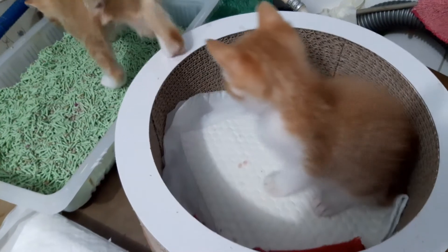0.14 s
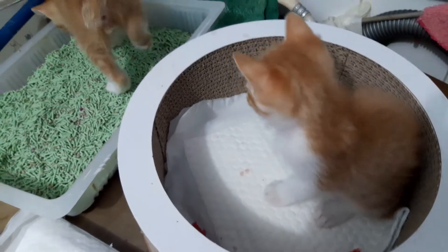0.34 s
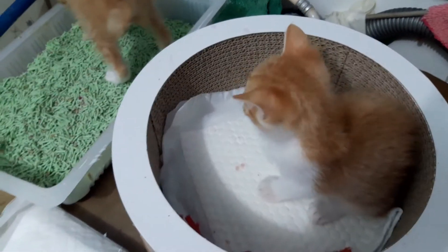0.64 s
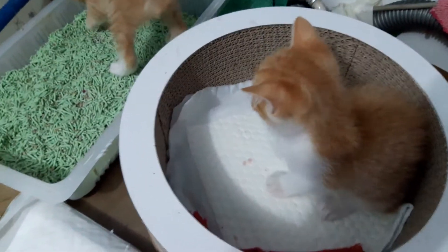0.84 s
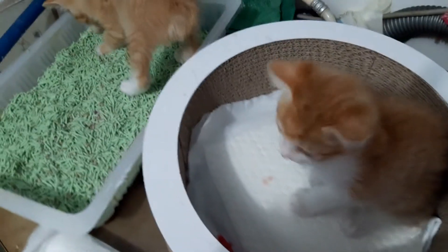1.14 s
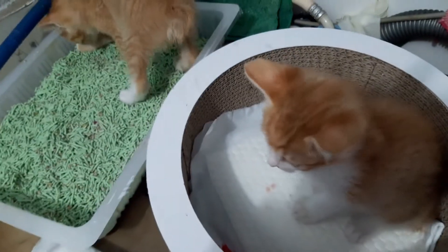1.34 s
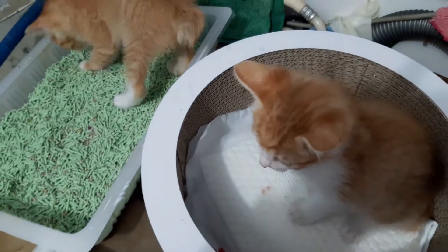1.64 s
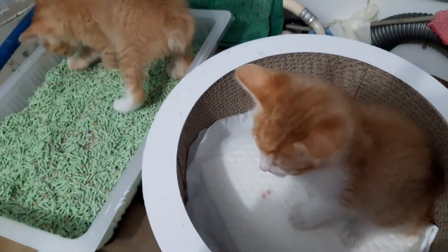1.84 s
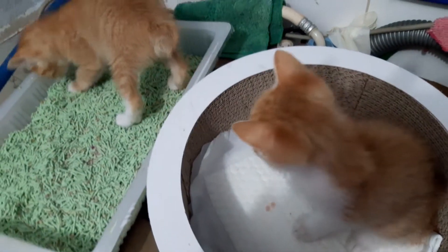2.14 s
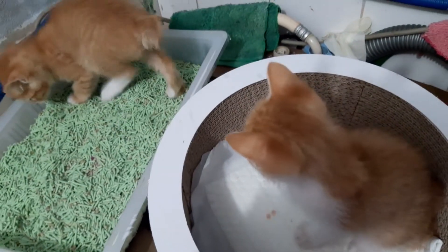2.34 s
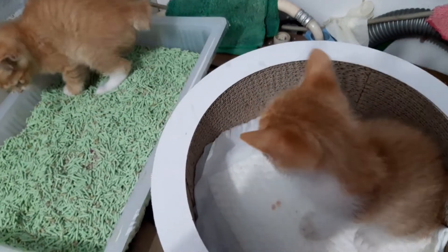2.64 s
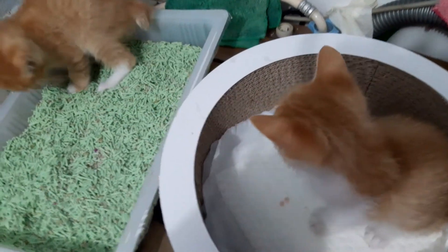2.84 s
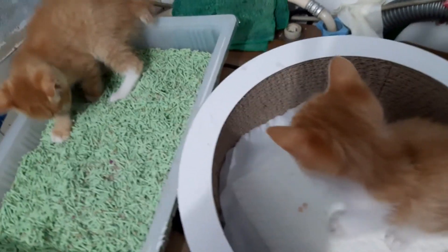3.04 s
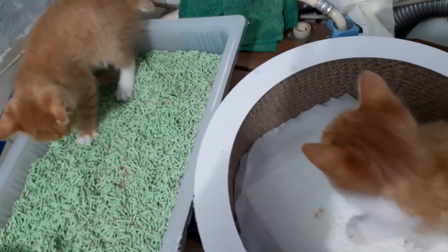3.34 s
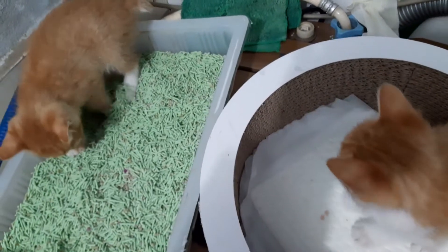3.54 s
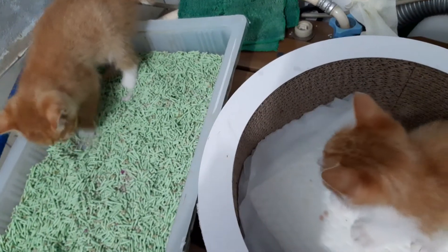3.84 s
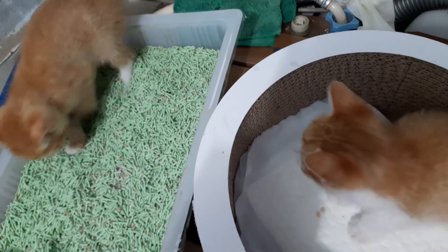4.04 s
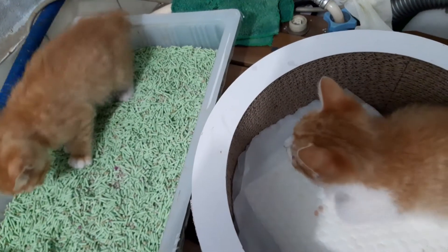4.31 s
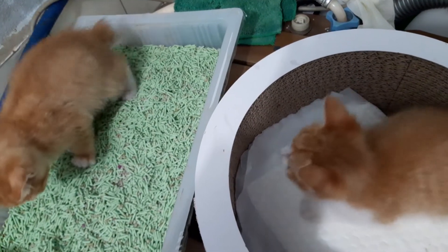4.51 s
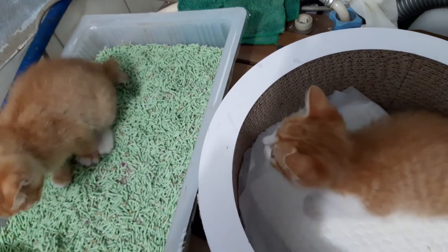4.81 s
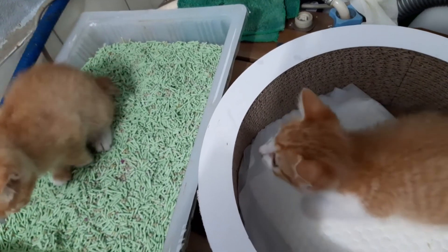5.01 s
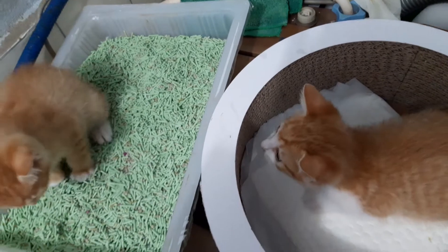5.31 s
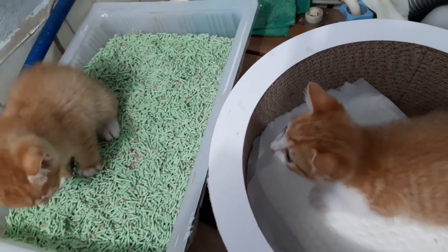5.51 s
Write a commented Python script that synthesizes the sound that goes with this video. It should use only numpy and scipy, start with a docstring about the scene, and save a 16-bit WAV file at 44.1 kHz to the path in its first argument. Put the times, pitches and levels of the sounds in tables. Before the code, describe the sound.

A kitten scrapes and digs in pellet litter in a plastic tray, with uneven crunching strokes, rattling grains and small plastic clicks in a quiet room.

```python
"""Kitten digging in pellet litter

A kitten steps and digs in pellet litter in a plastic tray, close to a pair of spaced microphones in a small room.
Paw strokes are swelling showers of random contacts: pellets rattle, tray modes drum, walls knock, the floor booms.
Single ticks are short decaying sine bursts, soft steps are blunt pushes into the tray modes, swishes are puffs of
filtered noise. Short noise echoes and a faint room noise surround it all."""
import sys
import numpy as np
from scipy import signal
from scipy.io import wavfile

SR = 44100
rng = np.random.default_rng(int(sys.argv[2]) if len(sys.argv) > 2 else 0)


def master_out(mix):
    """Clip the mix to full scale and print it as 16-bit PCM to the path in sys.argv[1]."""
    frames = np.transpose(np.atleast_2d(mix))
    ceiling = np.clip(frames, -1, 1)
    pcm = np.round(ceiling * 32767).astype(np.int16)
    wavfile.write(sys.argv[1], SR, pcm)


N = 249870   # length in samples

# Paw strokes and shifts of weight. Each row: start of full pressure in seconds, hold in seconds,
# swell in seconds per 20 dB, fade in seconds per 20 dB (scaled for each layer below), drumming level in dB,
# then hollow modes, rattle, dust, wall knock and floor boom in dB above the drumming, left over right in dB.
STROKES = [(0.044, 0.021, 0.035, 0.11, -61, -1.1, -10, -16, -7.5, -13.3, -1.5),
           (0.337, 0.025, 0.075, 0.093, -96, 19, -22, 4.8, 12, 12, -2.9),
           (0.473, 0.017, 0.22, 0.99, -71.5, -24.4, -6, -5.5, -22, -11, -2),
           (0.562, 0.02, 0.018, 0.061, -71, -9, -2, -2, -20, -25, 2),
           (0.599, 0.049, 0.031, 0.034, -57.3, -14, -10, -17, -18, -36, 1.5),
           (0.65, 0.079, 0.041, 0.065, -63.5, 3.5, -7, -9.5, -3, -4, -0.5),
           (0.851, 0.011, 0.051, 0.04, -54, -10, -3, -2, -9, -18, -3),
           (0.856, 0.042, 0.0085, 0.16, -64.5, 11, -6, -5, 12.5, 9.5, 5),
           (1.198, 0.07, 0.071, 0.12, -44.5, -2.7, -9.5, -14.5, -11, -18.5, 4),
           (1.419, 0.011, 0.08, 0.074, -67, -23, -13, -10, -32.7, -31.1, 4.0),
           (1.578, 0.046, 0.051, 0.095, -38.5, -4.5, -9.0, -14.5, -12, -26, 2.5),
           (1.789, 0.072, 0.06, 0.12, -40.5, -4.5, -9, -14.5, -15.5, -26.0, 1.5),
           (1.981, 0.017, 0.033, 0.092, -44.5, -4.5, -9, -12, -7, -23.5, 4),
           (2.191, 0.0044, 0.3, 0.12, -64.5, 2.5, -12, -16, -4, -8, 1),
           (2.338, 0.0092, 0.01, 0.1, -81.5, -2, 7, 8, -5, -5, 0),
           (2.352, 0.13, 0.402, 0.28, -73, 2.3, -11, -21, -5, -7.5, -0.6),
           (2.533, 0.018, 0.034, 0.047, -56.5, 1.3, -10.9, -15.9, -10, -20, 1.9),
           (2.685, 0.071, 0.015, 0.22, -65.5, 3.5, -8.5, -16, -13, -12, 1),
           (2.797, 0.027, 0.099, 0.14, -56, 0.6, -8, -14.5, -14.5, -26, 3),
           (2.99, 0.025, 0.032, 0.049, -49, 0.5, -5.5, -14, -14.5, -29, 5.5),
           (3.115, 0.0046, 0.14, 0.1, -63.5, -2, -14, -13.8, -18, -38, 1),
           (3.229, 0.067, 0.065, 0.073, -48, 2, -7, -11, -6, -26, 3.0),
           (3.385, 0.055, 0.039, 0.083, -43, 0.3, -5, -12, -5, -20.5, 1),
           (3.45, 0.024, 0.072, 0.077, -39, -1, -10, -18, -13.5, -32, 3),
           (3.505, 0.046, 0.089, 0.1, -53.2, -2.9, -9.0, -11, -33.5, -43, 5),
           (3.668, 0.066, 0.067, 0.064, -39.5, -0.8, -5, -11.5, -11.5, -18, 2.5),
           (3.808, 0.013, 0.058, 0.14, -34.5, -1, -3, -8.5, -11, -27, 1.5),
           (3.871, 0.072, 0.12, 0.12, -36.5, -6, -8, -14, -17.5, -25, 2.5),
           (4.195, 0.062, 0.043, 0.04, -64.5, 2.2, -6.5, -22, 2.7, -16, -3),
           (4.322, 0.01, 0.32, 0.038, -57.5, -6, -12, -16.5, -11.8, -16.7, 2.5),
           (4.362, 0.015, 0.027, 0.16, -61, -2.7, -5.5, -17, -17.7, -24, -0.5),
           (4.467, 0.0093, 0.012, 0.062, -61.5, 6.5, -14, -13, -16, -12, 8),
           (4.503, 0.062, 0.024, 0.071, -53.5, -1.5, -9.5, -16, -5, -15, 1.5),
           (4.68, 0.0057, 0.032, 0.055, -62, -7.5, -17.5, -22, -12, -29.6, 3),
           (4.749, 0.09, 0.088, 0.41, -73.5, 1.5, -25, -19, 1, -1.5, 2),
           (4.911, 0.032, 0.027, 0.04, -64.5, -2.5, -25, -26.5, -21, -37.3, -2),
           (4.992, 0.021, 0.0092, 0.099, -54, -11.5, -9.5, -18, -18, -27, -0.5),
           (5.141, 0.067, 0.27, 0.062, -69, 1.5, -19, -19, -5, -9, 0),
           (5.249, 0.079, 0.031, 0.033, -53.5, -0.5, -8, -17.5, 2.5, -7, 0),
           (5.376, 0.058, 0.19, 0.11, -67, -1.5, -12.5, -15.5, -4, -4, 2),
           (5.57, 0.058, 0.043, 0.021, -80, -0.5, -19, -21, -23, -11, -3)]
# Delay of each stroke layer. In order: drumming, hollow, rattle, dust, knock, boom, in seconds; heavy parts answer late.
LAYER_LAG_S = (0, 0, .001, 0.0042, 0.0089, 0.013)
# Fade of each stroke layer, same order, as a factor on the stroke's fade; the heavy parts die slowest.
LAYER_FADE = (0.91, 0.92, 0.76, 0.75, 1.34, 2.16)
# Resonances of the tray walls and floor. Each row: frequency in Hz, width in Hz, relative level in dB.
TRAY_MODES = [(480, 53.5, -5), (558.7, 52.6, -1), (680, 51, -2), (743.3, 33, 2), (824, 46, 2),
              (925, 81, -2), (1122, 154, -7.5), (1341, 71, -5), (1498, 235, -6), (1830, 78, 1),
              (2015, 87, 0), (2154, 290, -3), (2400, 290, -6), (2627, 132, -2), (2828, 460, -9.5),
              (3554, 465, -9), (3730, 1040, -14), (4450, 530, -18.5)]
# Whole-wall bending. Each row: frequency in Hz, width in Hz, relative level in dB.
KNOCK_MODES = [(146.7, 5.6, 2.5), (235.3, 23, 3), (293, 36, 1), (330, 72, 2), (432, 68, -5.5)]
# The tray floor. Each row: frequency in Hz, width in Hz, relative level in dB.
BOOM_MODES = [(69.3, 20.7, -0.5), (111, 62.5, 3), (130.5, 39, 3)]
# Colour of pellet on pellet. Each row: frequency in Hz, relative level in dB per Hz.
RATTLE_SPECTRUM = [(1650, -17), (2800, 0.5), (3260, -8.5), (4170, 5.5), (4930, -8.5), (6120, -6.5),
                   (6630, 10.5), (7550, -16), (8540, -3), (10400, -9), (11200, -5.5), (12500, -10),
                   (15800, -13.5)]
# Single pellets and claws on plastic. Each row: time in seconds, relative level in dB, tap frequency in Hz,
# coarse snap and fine snap in dB against the tap (before a fixed lift of each), left over right in dB.
TICKS = [(0.4001, -80.5, 1520, -1, 29, -2), (0.5526, -62, 2950, -15, -11, 1.5),
         (0.599, -48.5, 1590, -28, -17, -16), (0.6553, -53, 1640, -21, -22, 1.5),
         (0.71, -55, 1320, -17, -5, -10), (1.0594, -83, 1760, -12, 10, 1.5),
         (1.7647, -34, 2000, -23, -28, -1), (1.9997, -34, 1900, -16, -5.5, 0),
         (2.3372, -59, 1370, -16, 2, -3), (3.1076, -40, 1980, -26, -31, 3), (3.195, -58, 1770, -18, 10, -2),
         (3.221, -39, 1460, -16, -1, 5), (3.2525, -38, 2430, -18, -21, 0), (3.548, -48, 1880, -3, 3, 3),
         (3.81, -37, 1810, -1, -9, 2), (3.9574, -47, 1940, -7, -16, -2), (4.0361, -38, 1990, -22, -14, 0),
         (4.1893, -44, 2080, -29, -29, 4), (4.24, -48.5, 2110, -12.5, -9, 0),
         (4.2765, -54, 2630, -7, -3, 1.5), (4.3073, -51, 2200, -16, -24, -2),
         (4.3766, -50.5, 2200, -11, -24, 2), (4.438, -58, 1710, -17, -10, 1.5),
         (4.468, -38, 1820, -32, -27, -7), (4.4655, -42.5, 1780, -33, -34, 13),
         (4.5014, -41, 1830, -21, -24, 2), (4.5584, -44, 1900, -21, -23, 1.5),
         (4.6427, -52, 1740, -21, -25, 0), (4.6746, -45, 1850, -31, -34, -6),
         (4.897, -55, 1550, -30, -26, 1.5), (4.9347, -46.5, 1410, -35, -30, -2),
         (4.9887, -39, 2170, -20, -16.5, -6), (5.0017, -40.5, 2860, -22, -30, 15.5),
         (5.0091, -39, 1610, -32, -27, -5), (5.235, -42.5, 1910, -30, -26, 4),
         (5.2924, -42, 2350, -19, -18, 6)]
# Pellet snap, a coarse group and a fine group. Each row: frequency in Hz, width in Hz.
SNAP_GROUPS = [(4500, 1070), (6500, 1700)], [(9500, 3700), (13000, 5000)]
# Paws landing. Each row: time in seconds, relative level in dB.
STEPS = [(0.648, -55), (0.849, -57), (0.893, -44), (3.391, -46), (3.959, -37), (4.181, -54), (4.508, -59),
         (5.234, -46)]
# Brief hiss in the top treble, perhaps fur brushing a rim. Each row: centre in seconds, half-length in seconds,
# level in dB.
SWISHES = [(.07, 0.072, -73), (.46, .06, -81), (0.655, 0.063, -81), (0.87, .02, -57)]
# Colour of the room noise. Each row: frequency in Hz, relative level in dB per Hz.
HUSH_SPECTRUM = [(18, -35), (30, 13), (88, -11), (174, 5), (318, 0), (612, -5), (755, -1.5), (1210, -2),
                 (1890, -6), (4260, -16.5), (4980, -15), (12800, -9.5), (15800, -10)]

HOLLOW_TOP_HZ, DUST_HZ = 1234, 7550   # the tray's hollow modes lie below, the finest grit above
WIDE_PAN_SHARE = 0.024   # hollow modes and dust fill the tray and hardly follow the paw's side
LEFT_LAG_S = (-.00038, -.00004)   # lag of the left microphone for the two ends of the tray; negative is earlier
TICK_LAG_S = -.00046   # left lag of the ticks: loose pellets mostly strike the tray's left end
TAP_RISE_S = 0.00028
SWISH_HZ = (11500, 15500)
ROOM_T60_S, ROOM_DB, WALL_CUT_HZ = .16, -6, 4100   # echoes above the cut die faster still
HUSH_DB = -75.5
CUTOFF_HZ = 15780


def digging():
    """Harder strokes move more pellets; slow ones leave separate clicks; the bed gives way in small crunches."""
    drum_db, hollow_db, rattle_db, dust_db, knock_db, boom_db, pan_db = strokes()
    crunch = from_db(1.22 * drift(64))
    tray_hits_per_s = 600 + 2500 * from_db(.5 * (drum_db + 43.0))
    on_tray = crunch * contacts(tray_hits_per_s, uneven_db=3.0)
    pellet_hits_per_s = 150 + 4000 * from_db(.5 * (rattle_db + 54.5))
    on_pellets = crunch * contacts(pellet_hits_per_s, uneven_db=1.0)

    hollow, hard = split(resonate(on_tray, TRAY_MODES), HOLLOW_TOP_HZ)
    clicks = rms_one(on_pellets) + 0.59 * rms_one(on_tray)   # a hit on the tray clicks too
    coarse, dust = split(colour(clicks, RATTLE_SPECTRUM), DUST_HZ)
    aimed = from_db(drum_db) * hard + from_db(rattle_db) * coarse
    wide = from_db(hollow_db) * hollow + from_db(dust_db) * dust

    # the floor carries a little to each side alone
    push = rms_one(contacts(1500, uneven_db=2.5)) + 0.42 * rng.standard_normal((2, N))
    boom = rms_one(resonate(resonate(push, BOOM_MODES), BOOM_MODES))
    knock = split(resonate(push, KNOCK_MODES), 152)[1]
    weight = from_db(knock_db) * knock + from_db(boom_db) * boom
    return sides(pan_db) * aimed + sides(WIDE_PAN_SHARE * pan_db) * wide + weight


def strokes():
    """Strokes swell, hold and fade, adding in power; gives each layer's level and the drumming's side, all in dB."""
    s, hold_s, swell_s, fade_s, drum_db, *above_db, pan_db = np.transpose(STROKES)[:, :, None]
    coarse = np.arange(0, N + 64, 64)   # one point every 64 samples
    powers = []
    for extra_db, lag_s, fade in zip([0, *above_db], LAYER_LAG_S, LAYER_FADE):
        late = coarse / SR - s - lag_s
        before = np.maximum(-late / np.maximum(swell_s, .005), 0)
        after = np.maximum((late - hold_s) / np.maximum(fade * fade_s, .005), 0)
        level_db = drum_db + extra_db - 20 * (before + after)
        powers.append(from_db(level_db) ** 2 + 1e-20)
    # the stronger stroke pulls the side its way
    side_db = np.sum(pan_db * powers[0], axis=0) / np.sum(powers[0], axis=0)
    curves = [10 * np.log10(np.sum(p, axis=0)) for p in powers] + [side_db]
    return [np.interp(np.arange(N), coarse, c) for c in curves]


def contacts(per_s, uneven_db):
    """Random pellet contacts all over the tray, each with its own lag at the left microphone; steady power."""
    at = np.flatnonzero(rng.random(N) < per_s / SR)
    strength = from_db(uneven_db * np.minimum(rng.exponential(1, N), 5))
    sizes = strength * rng.choice([-1, 1], N) / np.sqrt(per_s)   # denser showers have weaker hits
    lag = np.round(rng.uniform(*LEFT_LAG_S, N) * SR).astype(int)
    out = np.zeros((2, N))
    np.add.at(out[0], np.clip(at + lag[at], 0, N - 1), sizes[at])
    out[1, at] = sizes[at]
    return out


def ticks():
    """A tick is a short tap of a few cycles, a snap above it and a faint ring of the tray."""
    out, taps = np.zeros((2, N)), np.zeros((2, N))
    lag = round(TICK_LAG_S * SR)
    # a wider resonance gives a shorter snap
    coarse, fine = (sum(burst(hz, 1 / (np.pi * width_hz)) for hz, width_hz in group) for group in SNAP_GROUPS)
    for s, level_db, tap_hz, coarse_db, fine_db, pan_db in TICKS:
        tap = burst(tap_hz, TAP_RISE_S)
        sound = tap + from_db(coarse_db + 7.5) * coarse + from_db(fine_db + 7.0) * fine
        for side, at in enumerate([round(s * SR) + lag, round(s * SR)]):
            gain = from_db(level_db + 3.0) * sides(pan_db)[side]
            out[side, at:at + len(tap)] += gain * sound
            taps[side, at:at + len(tap)] += gain * tap
    return out + from_db(-8.0) * resonate(taps, TRAY_MODES)


def steps():
    """A soft pad lands: one blunt push into the floor, wall and tray modes."""
    push = np.zeros(N)
    for s, level_db in STEPS:
        push[round(s * SR)] = from_db(level_db + 43.5)   # lifted, as the filters spread each impulse thin
    push = signal.lfilter(*signal.butter(2, 900, fs=SR), push)
    knock = from_db(-8.5) * resonate(push, KNOCK_MODES)
    drum = from_db(-14.5) * resonate(push, TRAY_MODES)
    return resonate(push, BOOM_MODES) + knock + drum


def swishes():
    """Smooth puffs of the finest hiss, unrelated at the two microphones."""
    t = np.arange(N) / SR
    puffs = sum(from_db(level_db) * np.exp(-.5 * ((t - s) / half_s) ** 2) for s, half_s, level_db in SWISHES)
    band = signal.butter(2, SWISH_HZ, "band", fs=SR, output="sos")
    return puffs * rms_one(signal.sosfilt(band, rng.standard_normal((2, N))))


def room(x):
    """Dense echoes of nearby walls and furniture, duller with time, different at each microphone above the bass."""
    t = np.arange(int(.4 * SR)) / SR
    echoes = shared_bass_noise(len(t), 900)
    # the echoes carry little bass below about 450 Hz
    echoes = signal.lfilter(*signal.butter(2, 450, "high", fs=SR), echoes)
    low = signal.lfilter(*signal.butter(1, WALL_CUT_HZ, fs=SR), echoes)
    high = (echoes - low) * from_db(-40 * t / ROOM_T60_S)   # extra loss on top of the common decay
    echoes = (low + high) * from_db(-60 * t / ROOM_T60_S) * (t > .001)
    echoes /= np.sqrt(np.sum(echoes ** 2, axis=1, keepdims=True))
    return from_db(ROOM_DB) * signal.fftconvolve(x, echoes, axes=1)[:, :N]


def hush():
    """Steady room noise, alike at both microphones only in the bass."""
    white = shared_bass_noise(N, 600)
    return from_db(HUSH_DB) * split(colour(white, HUSH_SPECTRUM), 45)[1]


def shared_bass_noise(length, bass_hz):
    """Two white noises that share their bass, as the long waves of a room do at two microphones."""
    common, *own = rng.standard_normal((3, length))
    bass = signal.butter(1, bass_hz, fs=SR)
    return own - signal.lfilter(*bass, own) + signal.lfilter(*bass, common)


def resonate(x, modes):
    """Parallel resonances with alternating signs."""
    out = 0
    for k, (hz, width_hz, level_db) in enumerate(modes):
        r = np.exp(-np.pi * width_hz / SR)
        top = (1 - r * r) / 2 * from_db(level_db) * (-1) ** k
        poles = [1, -2 * r * np.cos(2 * np.pi * hz / SR), r * r]
        out = out + signal.lfilter([top, 0, -top], poles, x + 1e-18)
    return out


def colour(x, spectrum):
    """Third-octave bank whose gains follow a spectrum."""
    hz, level_db = np.transpose(spectrum)
    edges = hz[0] * 2 ** np.arange(0, np.log2(hz[-1] / hz[0]) + 1 / 3, 1 / 3)
    out = 0
    for k, (low, high) in enumerate(zip(edges, edges[1:])):
        band = signal.sosfilt(signal.butter(2, [low, high], "band", fs=SR, output="sos"), x + 1e-18)
        gain = from_db(np.interp(np.log(low * high) / 2, np.log(hz), level_db))
        out = out + (-1) ** k * gain * band
    return out


def split(x, hz):
    """Below and above a frequency, each with unit rms."""
    filters = [signal.butter(4, hz, kind, fs=SR, output="sos") for kind in ("low", "high")]
    return [rms_one(signal.sosfilt(sos, x)) for sos in filters]


def burst(hz, rise_s):
    """A few cycles under an envelope that swells to 1 and dies."""
    t = np.arange(int(.012 * SR)) / SR
    return t / rise_s * np.exp(1 - t / rise_s) * np.sin(2 * np.pi * hz * t)


def drift(rate_hz):
    """Slow random wander of unit rms."""
    r = np.exp(-2 * np.pi * rate_hz / SR)
    noise = rng.standard_normal(N + 4000)   # the first 4000 samples let the filter settle
    return rms_one(signal.lfilter([1], [1, -2 * r, r * r], noise)[4000:])


def sides(pan_db):
    """Left and right gains for a level difference."""
    return from_db(np.array([pan_db, -pan_db]) / 2)


def from_db(db):
    """Decibels to gain."""
    return 10 ** (np.asarray(db) / 20)


def rms_one(x):
    """Scale to unit rms."""
    return x / np.sqrt(np.mean(x ** 2) + 1e-20)


def scene():
    """The tray, its echoes and the room noise."""
    tray = digging() + ticks() + steps() + swishes()
    return tray + room(tray) + hush()


def record(dry):
    """The top is cut steeply."""
    return signal.sosfilt(signal.ellip(12, .5, 75, CUTOFF_HZ, fs=SR, output="sos"), dry)


dry = scene()
out = record(dry)
master_out(out)
```